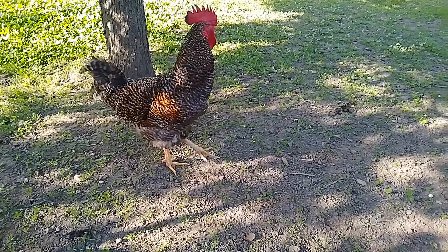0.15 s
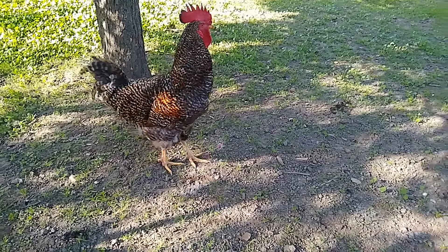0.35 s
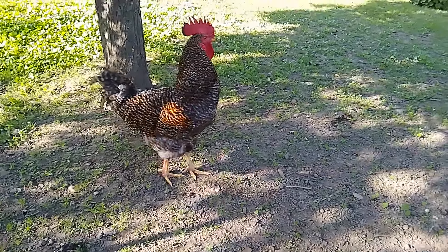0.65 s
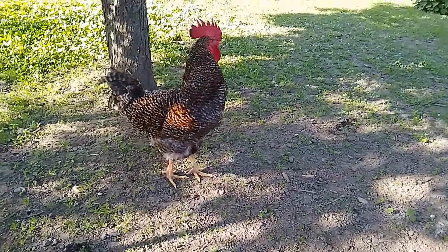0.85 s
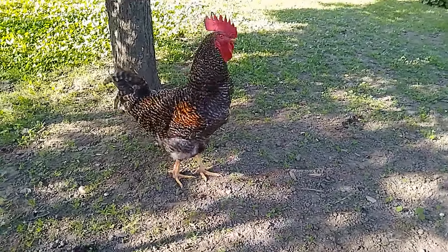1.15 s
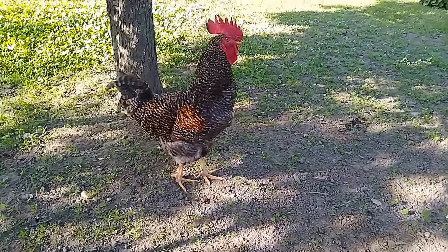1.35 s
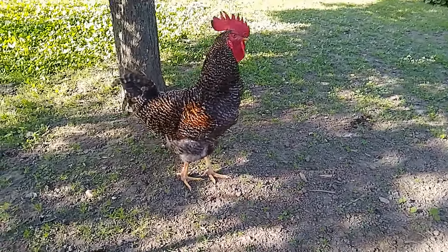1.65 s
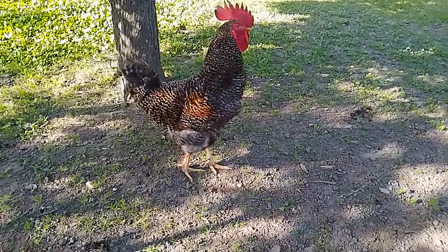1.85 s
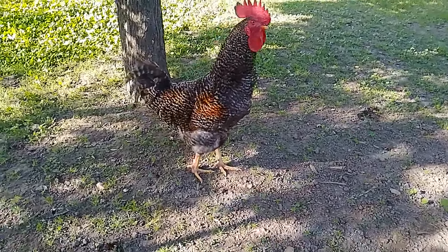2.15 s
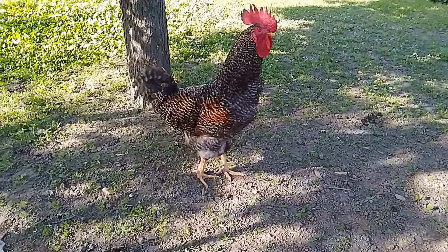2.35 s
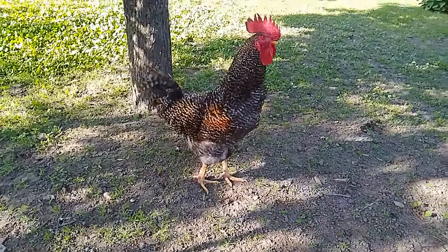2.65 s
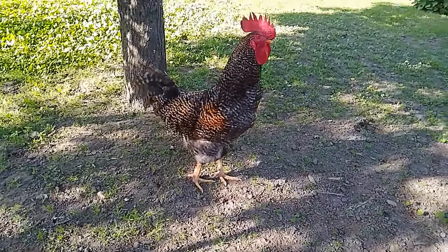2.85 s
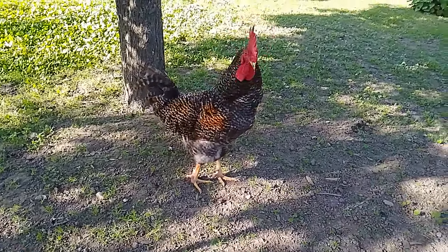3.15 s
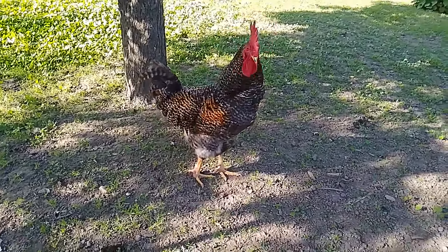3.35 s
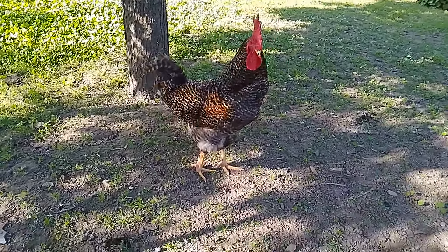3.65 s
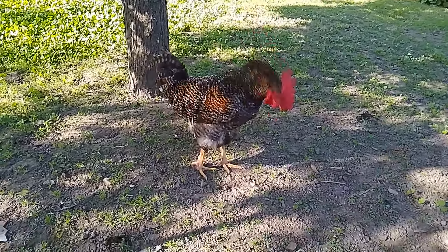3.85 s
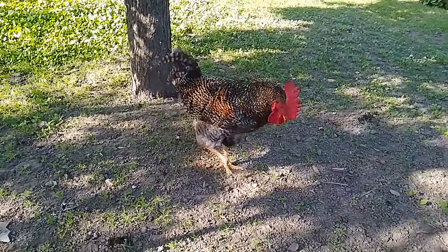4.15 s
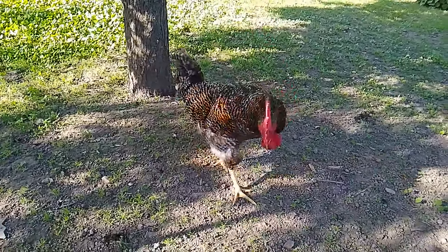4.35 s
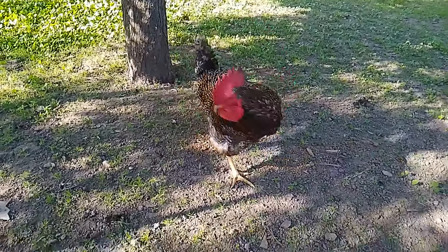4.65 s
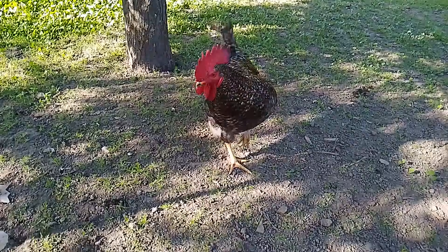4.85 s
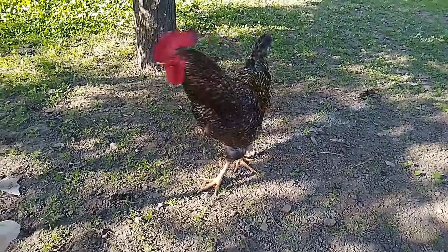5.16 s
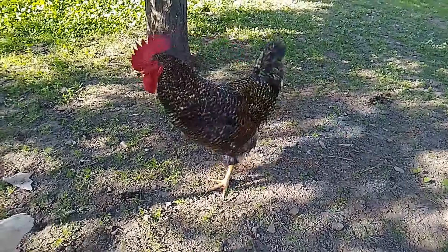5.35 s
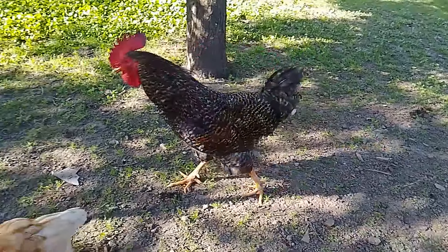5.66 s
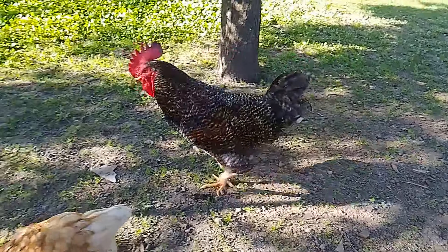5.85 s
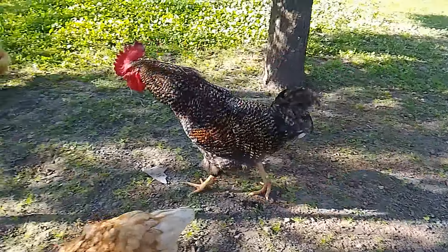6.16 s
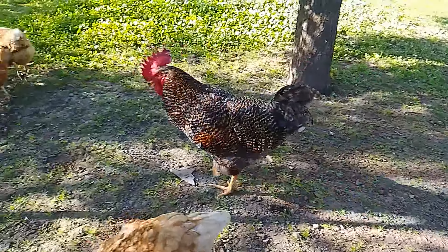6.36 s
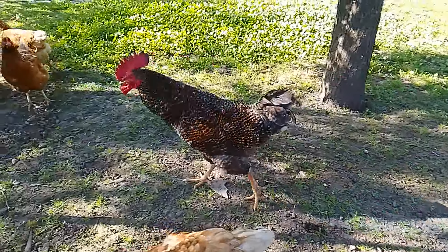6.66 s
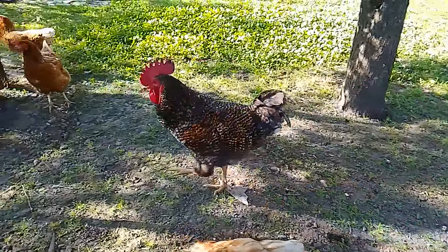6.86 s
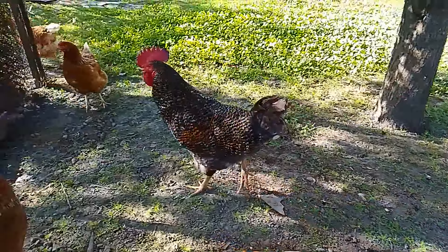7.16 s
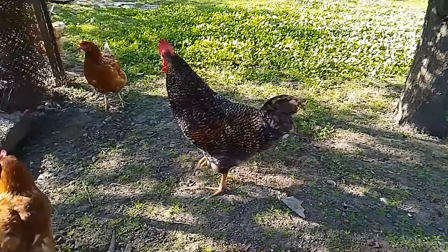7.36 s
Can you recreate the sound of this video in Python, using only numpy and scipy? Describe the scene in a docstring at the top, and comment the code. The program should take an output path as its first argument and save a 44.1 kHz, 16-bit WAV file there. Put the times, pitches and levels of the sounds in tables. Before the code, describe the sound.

Close outdoor sound of a small flock under trees. Early clucks and a gritty scratch give way to a harsh far squawk and a faint passing engine hum. Small birds chirp before a loud, pulsating nasal whine rises from the nearest chicken, ending with a short extra burst. A second whine follows, overlapped by softer voices, then busy clucks and a rough squawk, with light echo and faint air.

```python
"""Two long, clear, throbbing whines from a hen close by, in a farm yard under trees: a few clean partials slide in pitch.
Other hens cluck, croon and squawk nearer and farther off: rows of partials through throat resonances, roughened by noise.
Sparrows chirp in the branches as buzzing sweeps; feet scratch the dry ground as short rings and crackling noise.
A far engine hums by on three low orders, leaves and air are shaped noise, and the walls send a late echo."""
import sys
import numpy as np
from scipy import signal
from scipy.fft import rfft, irfft, next_fast_len
from scipy.io import wavfile
from scipy.ndimage import uniform_filter1d

SR = 44100
rng = np.random.default_rng(int(sys.argv[2]) if len(sys.argv) > 2 else 0)


def unload_audio(sound):
    """Save the sound as a 16-bit wav file, at the path given as the first command line argument."""
    columns = np.transpose(np.atleast_2d(sound))
    # keep every value between -1 and 1, then stretch to whole-number steps
    steps = np.round(np.clip(columns, -1, 1) * 32767)
    wavfile.write(sys.argv[1], SR, steps.astype(np.int16))


N = 330805
TIME = np.arange(N) / SR   # seconds

# Source levels in all tables are those of the dry mix, ahead of the gain in FADE_GAIN.

# Near hen, one table a breath, one row a throb of the voice. Each row: peak time in seconds, peak level in dB,
# rise in seconds from the dip before, depth of that dip in dB.
THROBS = [
    [(3.833, -49, 0.0052, 12), (3.893, -43, 0.053, 9.5), (3.923, -42, 0.012, 7), (3.955, -40, 0.019, 7.5),
     (3.982, -39, 0.0077, 6), (4.023, -37.5, 0.022, 7.5), (4.068, -36, 0.027, 27),
     (4.102, -33.5, 0.016, 11.5), (4.145, -46, 0.025, 18), (4.19, -33.5, 0.034, 5.5),
     (4.217, -30, 0.02, 1.5), (4.248, -32.5, 0.0081, 2.5), (4.296, -29, 0.0092, 5.5),
     (4.327, -30, 0.0078, 5), (4.365, -32, 0.013, 5.5), (4.395, -34, 0.017, 2), (4.437, -31.5, 0.0092, 8.5),
     (4.458, -32.5, 0.013, 4.5), (4.494, -27.5, 0.02, 12), (4.519, -28, 0.0046, 2.5),
     (4.549, -29.5, 0.019, 9.5), (4.582, -27.5, 0.024, 7), (4.605, -25, 0.022, 2), (4.635, -29, 0.018, 13),
     (4.654, -26, 0.0098, 7), (4.696, -29, 0.019, 42.5), (4.724, -28, 0.022, 16), (4.746, -27.5, .009, 10),
     (4.768, -25.5, 0.0074, 2), (4.811, -27, 0.028, 0), (4.838, -23, 0.0052, 8.5)],
    [(4.995, -25.5, 0.017, 28), (5.038, -31.5, 0.03, 20), (5.062, -27.5, 0.019, 3),
     (5.083, -28, 0.0054, 1.5)],
    [(6.271, -36, 0.021, 13.5), (6.305, -36.5, 0.022, 25), (6.339, -36.5, 0.012, 6.5),
     (6.382, -33.5, 0.013, 11.5), (6.431, -34.5, 0.021, 16), (6.463, -32.5, 0.019, 2.5),
     (6.495, -26, 0.021, 10), (6.532, -27, 0.015, 9.5), (6.578, -25, 0.022, 11), (6.599, -26.5, 0.0079, 3),
     (6.629, -27.5, 0.011, 11)],
    [(6.74, -34, 0.022, 28.5), (6.767, -28, .0078, 6), (6.798, -28.5, 0.012, 13.5),
     (6.83, -30, 0.0082, 12.5), (6.874, -36.5, 0.031, 15), (6.902, -29, 0.03, 24.5),
     (6.928, -27, 0.0098, 3.5), (6.959, -30, 0.019, 11)],
]
# Course of each breath; the voice stops at the last row. Each row: time in seconds, pitch in Hz before the
# slides of the throbs, beak opening as second over first partial in dB before dips and slides weaken it.
BREATHS = [
    [(3.83, 650, -19), (3.9, 620, -4.5), (3.97, 621, -1), (4.08, 605, 8), (4.25, 621.7, 5.5),
     (4.42, 598.6, 7), (4.52, 599, 13.5), (4.65, 591.3, 14), (4.71, 579, 13.5), (4.78, 568, 15),
     (4.862, 551, 20)],
    [(4.99, 517, 22.5), (5.04, 552.5, 14.5), (5.065, 544, 16.5), (5.101, 586, 12)],
    [(6.27, 543, 11.5), (6.31, 566, 10), (6.38, 551, 19.5), (6.43, 566, 13.5), (6.49, 561, 19.5),
     (6.54, 568, 21), (6.648, 545, 16)],
    [(6.74, 541.6, 11.5), (6.8, 555.5, 10.5), (6.87, 565.4, 11.5), (6.91, 544, 9), (6.985, 555, 13.5)],
]
# Third partial against the second, one value a breath, in dB before effort and throat shape it.
THIRD_PARTIAL_DB = [-6.5, 4.5, -18, -4.5]
# Size of the pitch jumps, one share a breath.
SLIDE_SHARES = [0.8, 0.71, 0.94, 1]
# The voice cracks into half lines. Each row: start in seconds, length in seconds, peak in dB against the second partial.
CRACKS = [(4.726, 0.023, -32.5), (4.994, 0.033, -8.5), (5.06, 0.033, -25.5)]

# Second hen, soft whines, one table a call. Each row: time in seconds, pitch in Hz, level in dB before it flutters.
SOFT_WHINES = [
    [(6.05, 542, -66), (6.105, 624, -48.5), (6.13, 620, -51.5), (6.157, 617, -44), (6.2, 667, -47),
     (6.232, 671, -36.5), (6.268, 550, -49.5)],
    [(6.43, 641, -50), (6.48, 672, -40), (6.53, 651, -41.5), (6.55, 637, -69)],
    [(6.65, 578, -67), (6.667, 614, -45.5), (6.7, 654, -51.5), (6.78, 687, -38.5), (6.81, 700, -63)],
]
# Her throat, one row a call. Each row: resonance at the start in Hz, resonance at the end in Hz.
SOFT_THROATS = [(530, 1076), (880, 1070), (733, 1040)]

# A low croon. Each row: time in seconds, pitch in Hz, level in dB, roughness (0 is clear).
CROON = [(5.78, 233, -62.5, 0.3), (5.82, 236.6, -58, 0.54), (5.835, 241, -46, 0.03),
         (5.855, 243.4, -49, 0.06), (5.885, 261.2, -42.5, 0), (5.924, 237.7, -51, 0),
         (5.96, 253, -45.5, 0.26), (5.985, 238, -55.5, 1.16), (6.01, 214, -63, 0.26)]
# Its throat. Each row: resonance at the start in Hz, at the end in Hz, width in Hz, strength in dB.
CROON_THROAT = [(236, 223, 51, 3), (810, 670, 450, 2)]
# Two squawks across the yard, one table each. Each row: time in seconds, pitch in Hz,
# level in dB before the low cut, roughness (0 is clear).
SQUAWKS = [
    [(2.12, 280.4, -63, 0.54), (2.15, 293, -39.5, 0.27), (2.185, 288, -35, 0.04), (2.245, 283.6, -35.5, 0),
     (2.27, 287, -36, 0.15), (2.3, 293.2, -28.5, 0.08), (2.32, 290.7, -36.5, 0.15),
     (2.345, 288.2, -36, 0.28), (2.36, 280.8, -34, 0.16), (2.42, 275, -44, 0.58), (2.52, 268, -100, 0.64)],
    [(7.16, 450.7, -56.5, 0.52), (7.22, 466.5, -41.5, 0.84), (7.265, 463, -42, 0.37),
     (7.3, 474, -42.5, 0.2), (7.355, 471.7, -41, 0.25), (7.41, 465.8, -54.5, 0.42), (7.47, 483, -56, 0.6)],
]
# Open throat and beak of each squawking hen. Each row: resonance at the start in Hz, at the end in Hz,
# width in Hz, strength in dB.
SQUAWK_THROATS = [
    [(575, 570, 85, -22.5), (1178, 1343, 300, 3.5), (2200, 1850, 510, -8.5), (3970, 3150, 153, -16.5),
     (5380, 5300, 290, -28.5)],
    [(1300, 870, 710, 19), (2000, 2070, 370, 11.5), (2900, 3100, 1160, -1), (5700, 6100, 1100, -7.5)],
]

# Clucks, one table a voice. Each row: start in seconds, length in seconds, first pitch in Hz, last pitch in Hz,
# peak level in dB.
CLUCKS = [
    [(.122, 0.046, 441.5, 356, -40), (.16, 0.052, 394, 454, -38.5), (.334, 0.047, 406, 325, -39),
     (.378, 0.047, 435, 420, -37.5)],
    [(1.085, 0.058, 386.5, 376, -65.5), (1.335, 0.078, 369.6, 357.6, -56), (1.575, 0.046, 354, 357, -63.5),
     (1.815, 0.081, 341.7, 353, -56)],
    [(6.43, 0.03, 258.4, 227, -42.5), (6.89, 0.024, 249, 240, -36), (6.907, 0.015, 278, 223, -33),
     (7.179, 0.04, 266, 218.5, -31), (7.329, 0.024, 270.4, 232, -30)],
    [(2.68, 0.073, 409, 378, -64), (3.578, 0.039, 702, 593, -49.5), (3.782, 0.023, 367, 308, -37),
     (5.002, 0.032, 613, 694, -39.5), (6.976, 0.022, 623, 613, -42)],
    [(7.018, 0.046, 340.5, 281.6, -33), (7.056, 0.035, 572.5, 528, -28.5), (7.085, 0.026, 394, 308, -33.5),
     (7.286, 0.056, 564.5, 499, -31)],
    [(2.045, 0.033, 269, 285, -55.5), (2.066, 0.039, 281, 287, -45), (2.102, 0.025, 282, 284, -53)],
]
# Voices of the six tables; the last is the first squawker's soft lead-in. Each row: roughness from 0 to 1,
# throat in Hz, throat width in Hz, resonance on the first partial in dB, upper throat in Hz,
# upper throat in dB, scattered echo in dB.
CLUCK_VOICES = [(0.04, 778, 145, -19, 1520, -28.5, -17), (0.39, 1040, 420, -17, 1910, -7, -3),
                (0.29, 558, 170, -43.5, 2400, -24, -16), (0.04, 786, 130, -25, 1320, -30.5, -9),
                (0.23, 833, 430, -22.5, 1320, 0, -16), (0.36, 1160, 110, -36, 2000, -9, -15)]

# Sparrow notes, one table a kind: hazy rising, high, loud falling, buzzy falling, thin, arched, dipping then rising,
# upswing into the loud note, far whistle. Each row: start in seconds, length in seconds, middle pitch in Hz, peak in dB.
SPARROWS = [
    [(3.36, 0.11, 3700, -62.5), (4.14, 0.058, 3810, -62), (5.695, 0.035, 3840, -64)],
    [(3.485, 0.093, 5310, -63), (4.36, 0.072, 4870, -62.5)],
    [(3.535, 0.078, 3880, -46), (4.41, 0.085, 3620, -46)],
    [(3.6, 0.043, 3867, -51), (4.49, 0.077, 3580, -55), (6.03, 0.045, 3440, -55.5)],
    [(1.84, 0.015, 3870, -58.5), (4.09, 0.045, 4460, -71)],
    [(5.916, 0.093, 3724, -48)],
    [(.168, .12, 3690, -67.5), (1.82, 0.2, 3600, -69), (4.635, 0.07, 3730, -61)],
    [(3.492, 0.058, 3050, -64), (4.368, 0.1, 3030, -66.5), (5.885, 0.049, 2920, -64)],
    [(.64, .07, 2340, -74), (0.76, 0.18, 2430, -75)],
]
# Shape of each kind. Each row: start as a share of the middle pitch, end as a share of it, buzz depth in Hz.
NOTE_SHAPES = [(0.97, 1.1, 190), (1.1, 1.2, 290), (1.08, 0.8, 140), (0.95, 0.88, 400), (0.95, .92, 60),
               (0.88, 0.66, 83), (1.1, 1.3, 250), (.83, 1.1, 300), (1.01, .99, 8)]

# Claws on twigs and grit. Each row: start in seconds, level in dB before the attack softens it,
# ring in Hz, second ring in Hz, second ring against the first in dB.
SNAPS = [(.512, -33.5, 1550, 5100, -6), (.517, -24, 1370, 2260, -12), (0.52, -30, 1980, 5530, 0),
         (.533, -28, 6160, 5430, -3.5), (3.811, -16.5, 14300, 9800, -19.5), (3.812, -35.5, 6600, 8250, -6),
         (6.347, -20, 1846, 4980, -5), (6.64, -40, 2160, 1810, -9.5), (6.673, -43, 2210, 1800, -6)]
# Feet raking dust and leaves. Each row: start in seconds, length in seconds, level in dB at the top of
# the swell, ahead of the band filter, bottom of the band in Hz, top of the band in Hz.
RAKES = [(0.332, 0.15, -55.5, 3630, 5730), (0.503, 0.083, -48.5, 960, 10000),
         (3.817, 0.039, -58, 6040, 14500), (5.036, 0.088, -57, 2500, 6530), (5.162, 0.08, -59, 2620, 6000),
         (6.286, 0.3, -50, 500, 6400), (7.016, 0.1, -56, 496, 4960)]
# Colour of the raked grit. Each row: frequency in Hz, relative density in dB per Hz.
RAKE_COLOUR = [(410, -45.5), (700, 5.5), (2300, 0.5), (3850, -8), (4800, -4), (6280, -11), (7580, -20),
               (14000, -6)]

# Low bumps on the microphone. Each row: start in seconds, length in seconds, pitch in Hz, peak in dB.
THUMPS = [(6.644, 0.038, 60, -39), (6.741, 0.03, 55, -44.5)]
# A far engine revs past. Each row: time in seconds, firing rate in Hz, level of each order in dB before it wavers.
ENGINE = [(1.75, 38.95, -85), (2.25, 42.94, -69), (2.62, 46.5, -66.5), (3.0, 47.7, -77)]

# Leaves, far road and microphone hiss. Each row: frequency in Hz, relative density in dB per Hz.
AIR = [(24, -27.5), (38, 2.5), (64, 0), (134, -6), (356, -12.5), (714, -16.5), (1400, -18), (3910, -24.5),
       (4810, -23), (7650, -37), (14200, -30)]
# Rustle of leaves. Each row: time in seconds, level in dB.
BREEZE = [(0, -71.5), (2.5, -69.5), (3, -86.5)]
# Fade-in, which holds its last value. Each row: time in seconds, gain in dB.
FADE_GAIN = [(.03, -35), (.08, -4), (.125, 3)]

JUMP_HZ, JUMP_HZ_PER_DB = 7.7, 4   # pitch jump at a throb, before the breath's share: base, and more per dB of dip
DEEPEST_FELT_DB = 18               # deeper dips raise it no further
BEAK_DB_PER_DIP_DB, BEAK_DB_PER_HZ = 0.24, 0.21   # the second partial weakens in a dip and while the pitch is raised
UPPER_THROAT_HZ, UPPER_THROAT_WIDTH_HZ = 1775, 105   # favours the third partial near this pitch
EFFORT_SHARE = 0.9                 # dB on the third partial per dB of level
RELEASE_S, LAST_SAG_DB, RELEASE_DB = 0.012, 12.5, 30.5   # the last throb sags, then the voice cuts off
SQUAWK_TOP_HZ = 6730
EARLIER_PER_SAG = 0.41   # a cluck peaks earlier the more its pitch sags (share of length per share of pitch)
RING_CYCLES, SECOND_RING_CYCLES = 2.04, 3.7   # cycles until a ring has died to 1/e
SNAP_ATTACK_S = 0.00014
AIR_DB = -63.5      # floor before its bass turns lumpy
CUTOFF_HZ = 14200


def from_db(db):
    """Turns decibels into an amplitude factor."""
    return 10 ** (np.asarray(db) / 20)


def rms_one(x):
    """Scales a signal to an rms of 1."""
    return x / np.sqrt(np.mean(x ** 2) + 1e-20)


def at_hz(points, hz):
    """Reads a spectrum on a log-frequency axis."""
    points_hz, points_db = np.transpose(points)
    return np.interp(np.log(hz + 1), np.log(points_hz), points_db)


def span(start, end):
    """The samples between two times in seconds."""
    return slice(max(int(start * SR), 0), min(int(end * SR), N))


def curves(rows):
    """The stretch that a table covers, and its columns sample by sample."""
    s, *columns = np.transpose(rows)
    at = span(s[0], s[-1])
    return at, *(np.interp(TIME[at], s, column) for column in columns)


def wobble(size, hz):
    """Slow noise, low-passed at hz; rms 1."""
    low_pass = signal.butter(2, hz, fs=SR, output="sos")
    noise = signal.sosfilt(low_pass, rng.standard_normal(size + 2000))
    return rms_one(noise[2000:])   # drops the filter's settling


def coloured(spectrum):
    """Steady noise with a given spectrum; rms 1."""
    size = next_fast_len(N)
    hz = np.arange(size // 2 + 1) * SR / size
    bins = rfft(rng.standard_normal(size)) * from_db(at_hz(spectrum, hz))
    return rms_one(irfft(bins, size)[:N])


def swell(size, peak_at):
    """Rounded envelope 0-1-0 with its top at the given share of the length."""
    share = np.arange(size) / size
    warp = np.log(.5) / np.log(np.clip(peak_at, .05, .95))
    return np.sin(np.pi * share ** warp)


def diffuse(x, t60, delay):
    """Dense scattered echoes dying away after a delay, from a noise tail of unit energy."""
    t = np.arange(int(t60 * SR)) / SR
    tail = rng.standard_normal(len(t)) * from_db(-60 * t / t60)
    tail = np.r_[np.zeros(int(delay * SR)), tail / np.sqrt(np.sum(tail ** 2))]
    return signal.fftconvolve(x, tail)[:N]


def voice(pitch_hz, rough, throat, top_hz, turn=1):
    """Partials of a membrane through throat resonances; roughness shakes the pitch and smears partials into noise."""
    size = len(pitch_hz)
    shaken_hz = pitch_hz * (1 + 0.037 * rough * wobble(size, 100))
    phase = 2 * np.pi * np.cumsum(shaken_hz) / SR
    out, power = 0, 1e-12
    for k in range(1, int(1.4 * top_hz / np.mean(pitch_hz))):
        hz = k * pitch_hz
        peaks = [from_db(level_db) / (1 + ((hz - centre ** 2 / hz) / width) ** 2) ** 0.99
                 for centre, width, level_db in throat]
        gain = sum(peaks)
        # with turn = -1 the clear tone cancels between resonances
        clear = sum(turn ** i * peak for i, peak in enumerate(peaks)) / gain
        gain = gain / (1 + (hz / top_hz) ** 6)
        noise_share = np.clip(rough * (0.9 + k / 10), 0, 1)   # upper partials break up first
        turned = k * phase + 2 * np.pi * rng.random()
        smear = wobble(size, 110) * np.sin(turned) + wobble(size, 110) * np.cos(turned)
        tone = np.sqrt(1 - noise_share) * clear * np.sin(turned)
        out = out + gain * (tone + np.sqrt(noise_share / 2) * smear)
        power = power + gain ** 2 / 2
    return out / np.sqrt(power)


def drawn_call(rows, throat, top_hz, turn=1):
    """A call that follows its curves through a throat whose resonances drift as the beak moves."""
    out = np.zeros(N)
    at, pitch_hz, level_db, rough = curves(rows)
    moving = [(np.linspace(start_hz, end_hz, len(pitch_hz)), width, db)
              for start_hz, end_hz, width, db in throat]
    out[at] = from_db(level_db) * voice(pitch_hz, rough, moving, top_hz, turn)
    return out


def whine():
    """Four clean partials; the pitch slides down through each throb, and effort brings out the upper ones."""
    out = np.zeros(N)
    for throbs, breath, third_db, slide_share in zip(THROBS, BREATHS, THIRD_PARTIAL_DB, SLIDE_SHARES):
        course_s, course_hz, beak_db = np.transpose(breath)
        last_db = throbs[-1][1] - LAST_SAG_DB - RELEASE_DB
        release = (course_s[-1], last_db, RELEASE_S, -RELEASE_DB)
        s, peak_db, rise, dip_db = np.transpose(throbs + [release])
        rise = np.minimum(rise, np.diff(s, prepend=0) - .005)   # a throb needs time to sink
        at = span(s[0] - rise[0], s[-1])
        t = TIME[at]

        # level: dip, peak, dip, peak.. with rounded tops and rounded dips
        turns = np.ravel([s - rise, s], "F")
        order = np.arange(len(turns))
        place = np.interp(t, turns, order)
        place = np.floor(place) + np.sin(np.pi / 2 * (place % 1)) ** 2
        fullness = 1.3
        turn_levels = from_db(fullness * np.ravel([peak_db - dip_db, peak_db], "F"))
        level = np.interp(place, order, turn_levels) ** (1 / fullness)
        onset = np.clip((t - t[0]) / 0.0017, 0, 1)
        level = uniform_filter1d(level * onset, size=60) + 1e-9

        # the pitch stays low until a deep dip, then jumps up with the new throb
        jump_hz = slide_share * (JUMP_HZ + JUMP_HZ_PER_DB * np.clip(dip_db, 0, DEEPEST_FELT_DB))
        early_hz = -8.5 + 0.99 * jump_hz * np.clip(2.0 - dip_db / 14, 0, 1)
        slide_s = np.ravel([s - rise - .001, s - 0.52 * rise, s + 0.0036], "F")
        slide = np.interp(t, slide_s, np.ravel([early_hz, jump_hz, 0 * s], "F"))
        steady_hz = np.interp(t, course_s, course_hz)
        pitch_hz = steady_hz + uniform_filter1d(slide, size=120)
        phase = 2 * np.pi * np.cumsum(pitch_hz + 4.2 * wobble(len(t), 120)) / SR

        # strength of each upper partial against the first
        level_db = 20 * np.log10(level)
        sunk_db = np.interp(t, s, np.r_[peak_db[:-1], peak_db[-2]]) - level_db
        closing_db = BEAK_DB_PER_DIP_DB * np.clip(sunk_db, 0, 30) + BEAK_DB_PER_HZ * slide
        second = from_db(np.interp(t, course_s, beak_db) - closing_db)
        effort_db = level_db + 19.0
        third = second * from_db(third_db + EFFORT_SHARE * effort_db + 0.96 * wobble(len(t), 25))
        third = third / np.sqrt(1 + ((3 * steady_hz - UPPER_THROAT_HZ) / UPPER_THROAT_WIDTH_HZ) ** 2)
        fourth = second * from_db(third_db - 19 + 2.2 * effort_db)
        crack = sum(from_db(db) * np.clip(1 - (2 * (t - start) / length - 1) ** 2, 0, 1)
                    for start, length, db in CRACKS)

        tone = np.sin(phase) - second * np.cos(2 * phase)
        tone = tone - third * np.sin(3 * phase - 1) + fourth * np.sin(4 * phase)
        half_lines = np.sin(3 * phase / 2) + np.sin(5 * phase / 2) + np.sin(7 * phase / 2) / 2
        tone = tone + second * crack * half_lines
        out[at] += level * tone * np.sqrt(2 / (1 + second ** 2))   # first two partials together keep the level
    return out


def soft_whine():
    """A clear voice whose throat resonance climbs as the beak opens."""
    out = np.zeros(N)
    for rows, (start_hz, end_hz) in zip(SOFT_WHINES, SOFT_THROATS):
        at, pitch_hz, level_db = curves(rows)
        size = len(pitch_hz)
        flutter_db = 3.3 * wobble(size, 30)
        throat = [(np.linspace(start_hz, end_hz, size), 300, 0)]
        out[at] = from_db(level_db + flutter_db) * voice(pitch_hz, 0.017, throat, top_hz=1520)
    return out


def croon():
    """A low voice through two throat resonances that drift downward."""
    return drawn_call(CROON, CROON_THROAT, top_hz=1460)


def clucks():
    """Short sliding notes through fixed throat resonances; each voice has its own share of scattered echo."""
    direct, scattered = np.zeros(N), np.zeros(N)
    for cluck_voice, rows in zip(CLUCK_VOICES, CLUCKS):
        rough, throat_hz, width_hz, chest_db, upper_hz, upper_db, echo_db = cluck_voice
        for s, length, first_hz, last_hz, peak_db in rows:
            at = span(s, s + length)
            size = at.stop - at.start
            pitch_hz = np.linspace(first_hz, last_hz, size)
            # the chest resonance follows the pitch
            throat = [(pitch_hz, 90, chest_db), (throat_hz, width_hz, 0), (upper_hz, 250, upper_db)]
            peak_at = 0.56 - EARLIER_PER_SAG * (1 - last_hz / first_hz)
            envelope = from_db(peak_db) * swell(size, peak_at) ** 1.26
            note = envelope * voice(pitch_hz, rough, throat, top_hz=2130)
            direct[at] += note
            scattered[at] += from_db(echo_db) * note
    return direct + diffuse(scattered, 0.23, 0.0086)


def squawks():
    """Harsh far voices through wide-open throats, thinned in the bass and blurred by scattered echo."""
    far = sum(drawn_call(rows, throat, SQUAWK_TOP_HZ, turn)
              for rows, throat, turn in zip(SQUAWKS, SQUAWK_THROATS, (-1, 1)))
    low_cut = signal.butter(2, 480, "high", fs=SR, output="sos")   # a squawk carries little chest tone
    far = signal.sosfilt(low_cut, far)
    return far + from_db(-5) * diffuse(far, 0.23, .01)


def yard_echo(near):
    """Early scattered echoes of the near hens, and a late, narrow-band echo off the walls."""
    scattered = diffuse(near, .25, .006)
    late = diffuse(near, .05, .112)
    wall = signal.sosfilt(signal.butter(2, [900, 1400], "band", fs=SR, output="sos"), late)
    return from_db(-22) * scattered + from_db(-36) * wall


def sparrows():
    """Whistled sweeps with a fast buzz, smeared by branches."""
    out = np.zeros(N)
    for (start, end, buzz_hz), rows in zip(NOTE_SHAPES, SPARROWS):
        bend = np.polyfit([0, .5, 1], [start, 1, end], deg=2)
        for s, length, middle_hz, peak_db in rows:
            at = span(s, s + length)
            size = at.stop - at.start
            sweep_hz = middle_hz * np.polyval(bend, np.arange(size) / size)
            phase = 2 * np.pi * np.cumsum(sweep_hz + buzz_hz * wobble(size, 250)) / SR
            out[at] += from_db(peak_db) * swell(size, 0.28) * np.sin(phase)
    return out + from_db(3.0) * diffuse(out, 0.43, 0.0042)


def ground():
    """Snaps ring two short modes; raking is a dense crackle of band-passed noise; both scatter a little."""
    out = np.zeros(N)
    t = TIME[:900]
    attack = (1 - np.exp(-t / SNAP_ATTACK_S)) ** 2
    for s, peak_db, ring_hz, second_hz, second_db in SNAPS:
        first = np.sin(2 * np.pi * ring_hz * t) * np.exp(-t * ring_hz / RING_CYCLES)
        second = np.sin(2 * np.pi * second_hz * t) * np.exp(-t * second_hz / SECOND_RING_CYCLES)
        start = int(s * SR)
        out[start:start + 900] += from_db(peak_db) * (first + from_db(second_db) * second) * attack
    grit = coloured(RAKE_COLOUR) * from_db(2.16 * wobble(N, 400))
    for s, length, peak_db, bottom_hz, top_hz in RAKES:
        at = span(s, s + length)
        band = signal.butter(3, [bottom_hz, top_hz], "band", fs=SR, output="sos")
        envelope = from_db(peak_db) * swell(at.stop - at.start, 0.33) ** 2
        out[at] += envelope * signal.sosfilt(band, grit[at])
    return out + from_db(-11) * diffuse(out, 0.16, 0.0033)


def rumble():
    """A few slow swings for each bump, and three wavering low orders of the engine."""
    out = np.zeros(N)
    for s, length, hz, peak_db in THUMPS:
        at = span(s, s + length)
        swings = np.sin(2 * np.pi * hz * (TIME[at] - s))
        out[at] += from_db(peak_db) * swell(at.stop - at.start, 0.35) * swings
    at, firing_hz, level_db = curves(ENGINE)
    phase = 2 * np.pi * np.cumsum(firing_hz) / SR
    orders = sum(from_db(3.0 * wobble(len(phase), 10)) * np.sin(k * phase + k * k) for k in (1, 2, 3))
    out[at] += from_db(level_db) * orders
    return out


def air():
    """Steady floor with a lumpy bass, and leaves that rise and fall with the breeze."""
    floor = from_db(AIR_DB) * coloured(AIR)
    bass = signal.sosfilt(signal.butter(2, 150, fs=SR, output="sos"), floor)
    lumps = bass * (from_db(1.5 * wobble(N, 0.83)) - 1)
    leaf_band = signal.butter(4, [600, 6000], "band", fs=SR, output="sos")
    leaves = rms_one(signal.sosfilt(leaf_band, rng.standard_normal(N)))
    breeze_db = np.interp(TIME, *np.transpose(BREEZE))
    return floor + lumps + from_db(breeze_db) * leaves


def scene():
    """Near hens and their echoes, the rest of the flock, then sparrows, ground, rumble and air."""
    near = whine() + soft_whine() + croon()
    hens = near + yard_echo(near) + squawks() + clucks()
    return (hens + sparrows() + ground() + rumble() + air())[None]


def record(dry):
    """The sound fades in to a steady gain; deepest bass and top are cut."""
    faded = dry * from_db(np.interp(TIME, *np.transpose(FADE_GAIN)))
    faded = signal.sosfilt(signal.butter(2, 42, "high", fs=SR, output="sos"), faded)
    return signal.sosfilt(signal.ellip(10, 1, 60, CUTOFF_HZ, fs=SR, output="sos"), faded)


dry = scene()
out = record(dry)
unload_audio(out)
```